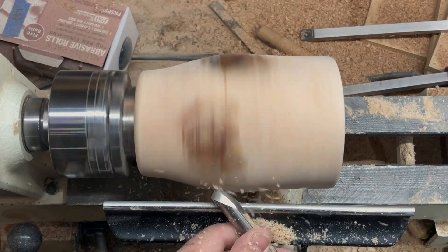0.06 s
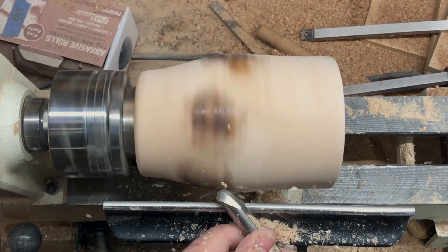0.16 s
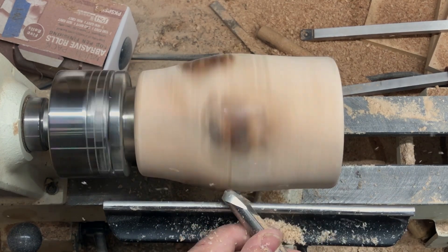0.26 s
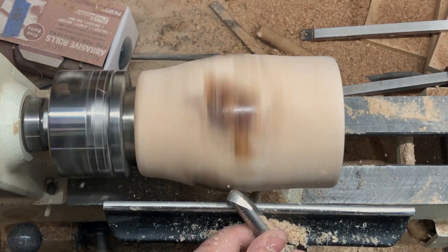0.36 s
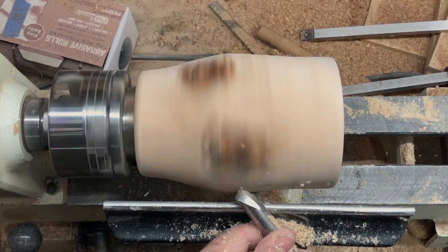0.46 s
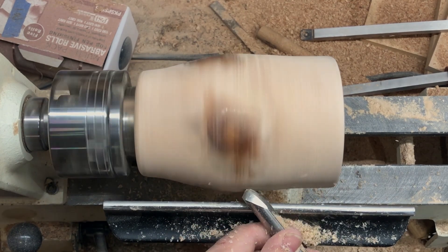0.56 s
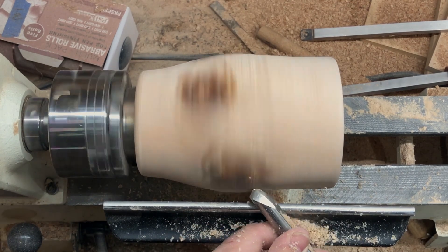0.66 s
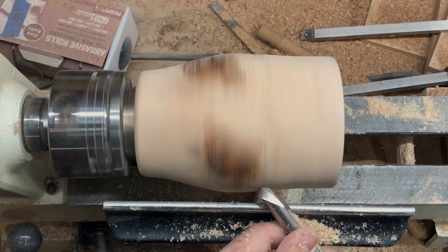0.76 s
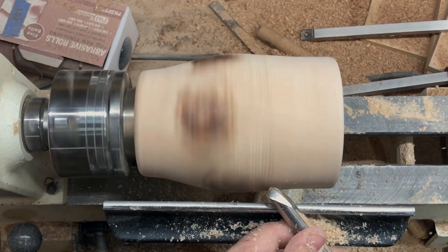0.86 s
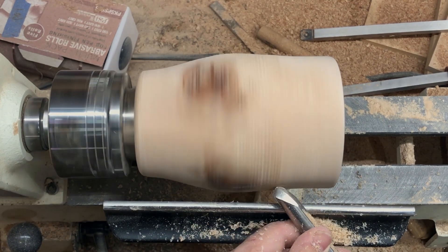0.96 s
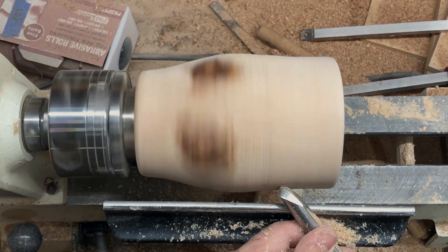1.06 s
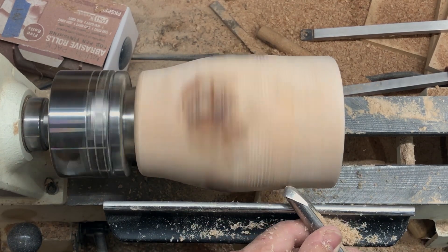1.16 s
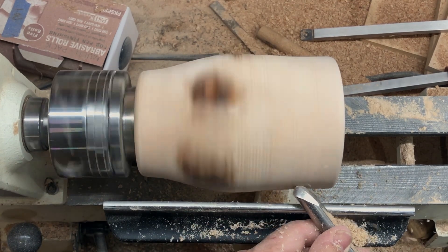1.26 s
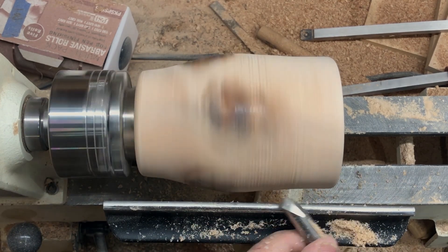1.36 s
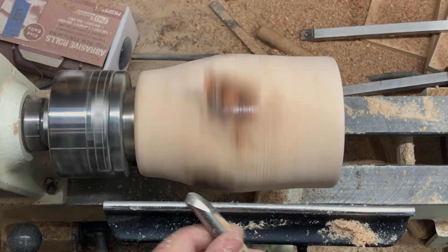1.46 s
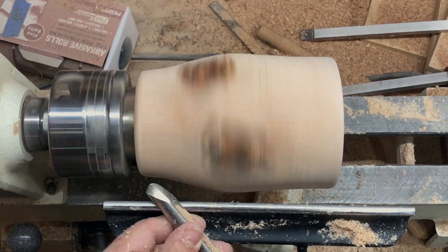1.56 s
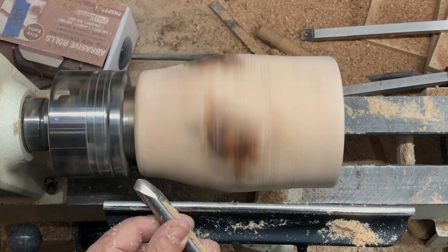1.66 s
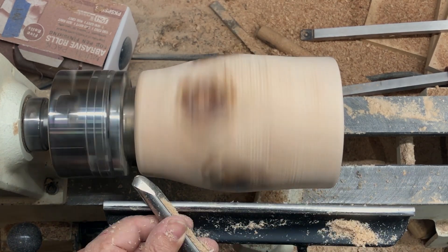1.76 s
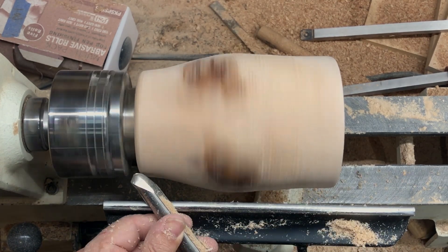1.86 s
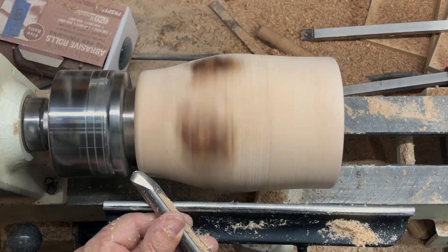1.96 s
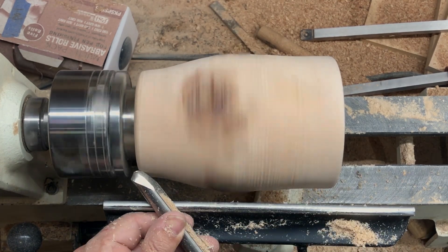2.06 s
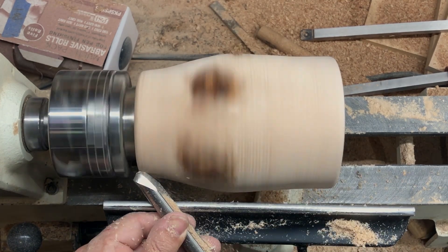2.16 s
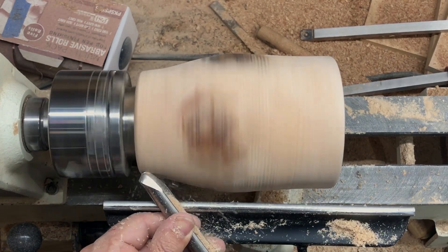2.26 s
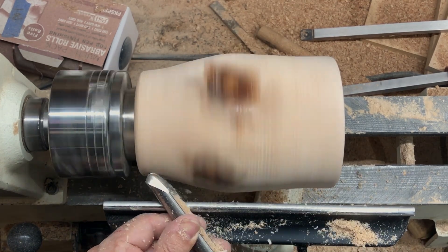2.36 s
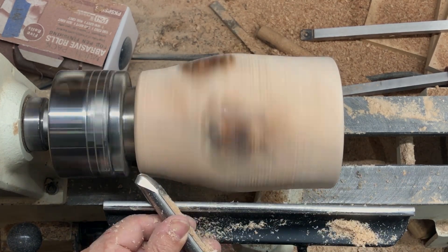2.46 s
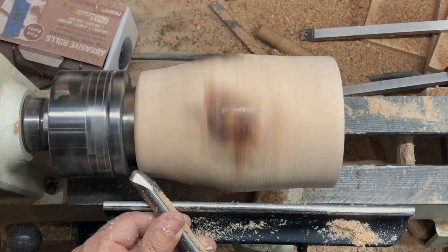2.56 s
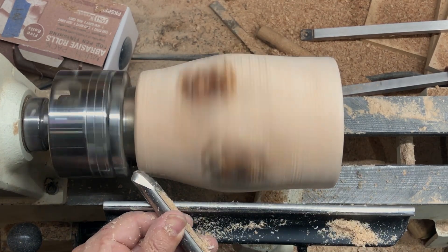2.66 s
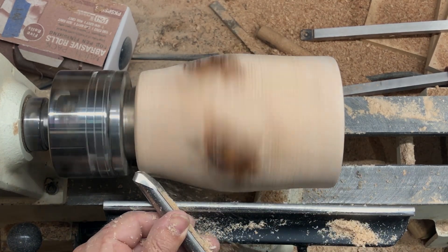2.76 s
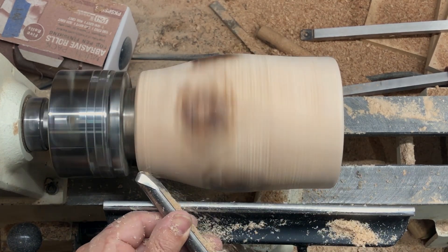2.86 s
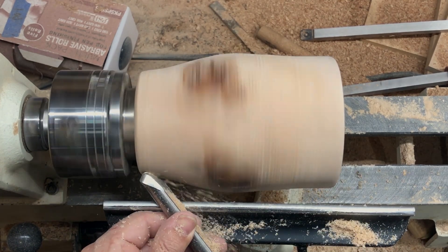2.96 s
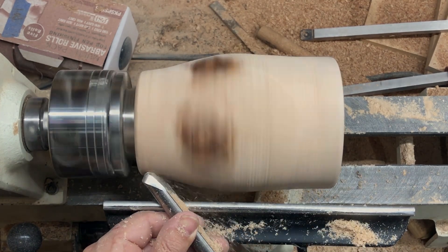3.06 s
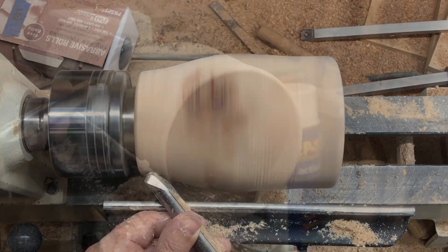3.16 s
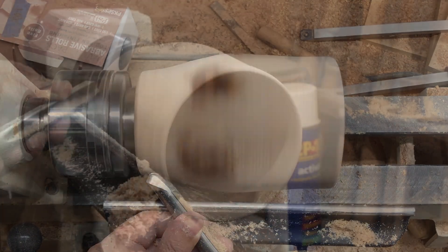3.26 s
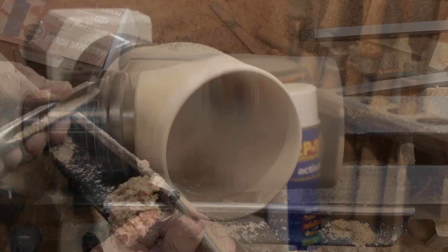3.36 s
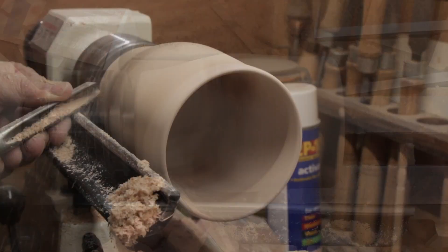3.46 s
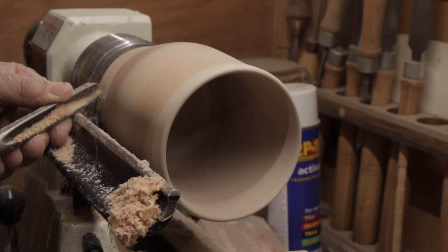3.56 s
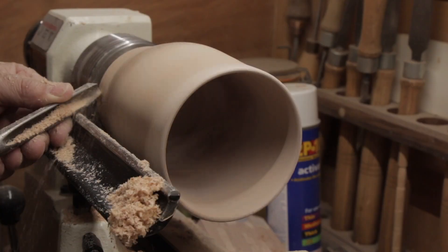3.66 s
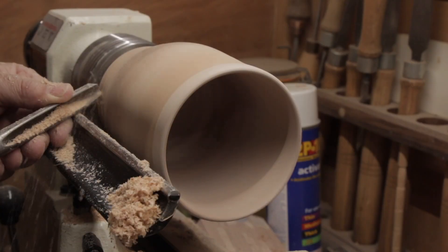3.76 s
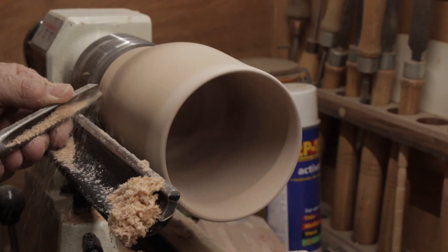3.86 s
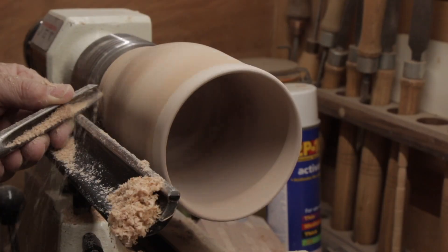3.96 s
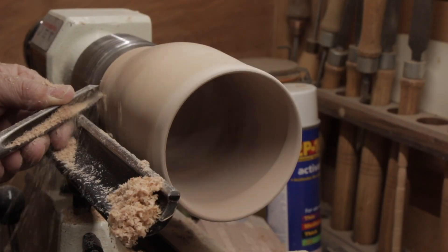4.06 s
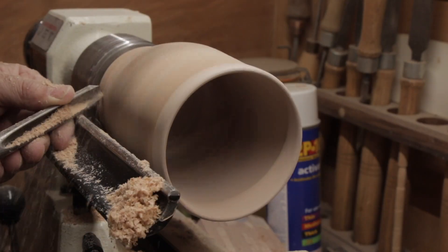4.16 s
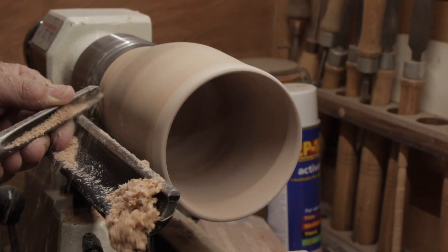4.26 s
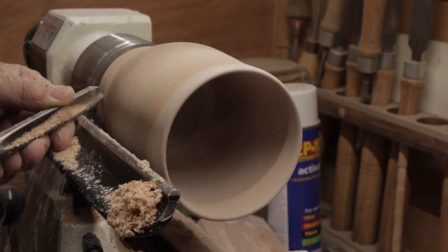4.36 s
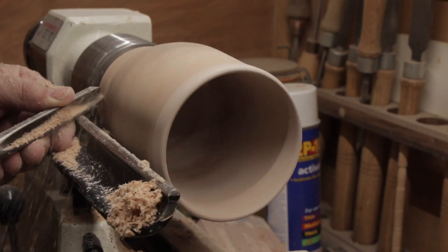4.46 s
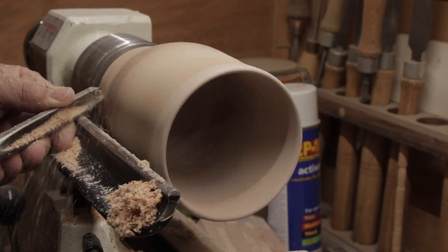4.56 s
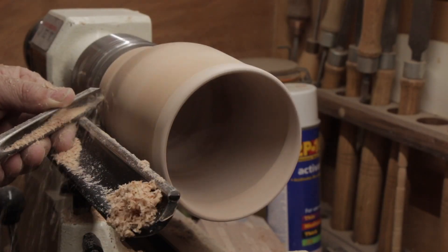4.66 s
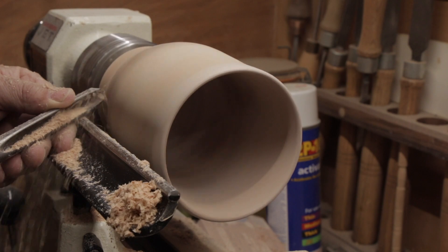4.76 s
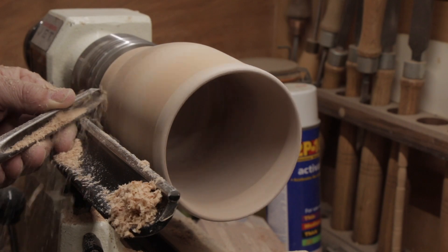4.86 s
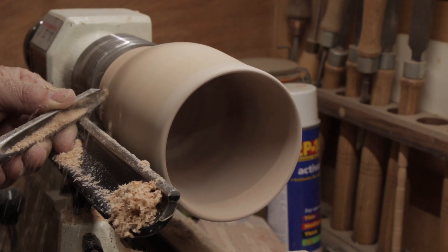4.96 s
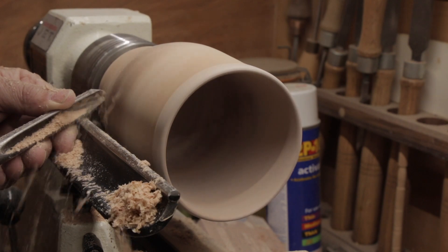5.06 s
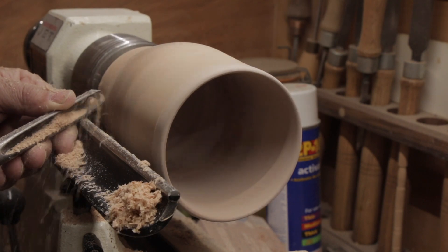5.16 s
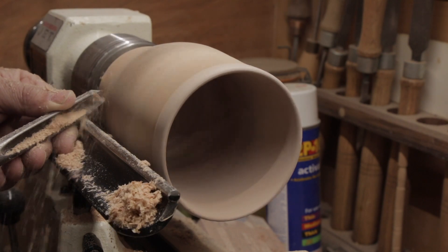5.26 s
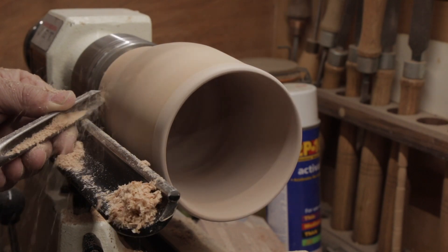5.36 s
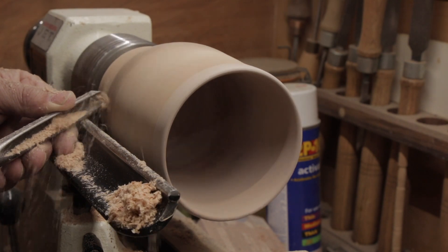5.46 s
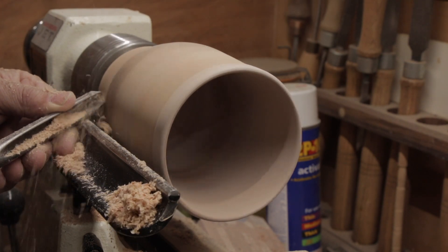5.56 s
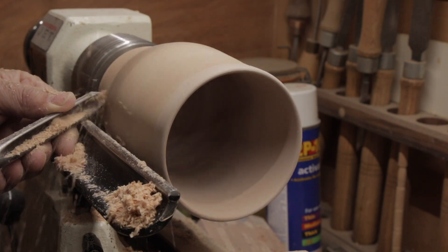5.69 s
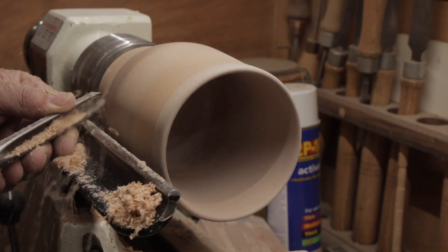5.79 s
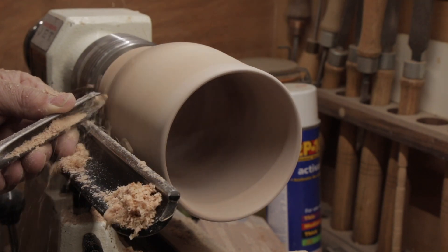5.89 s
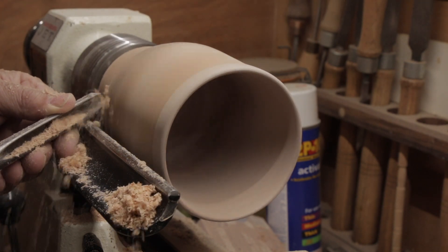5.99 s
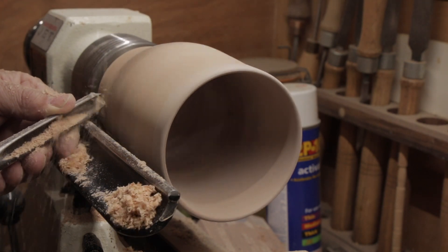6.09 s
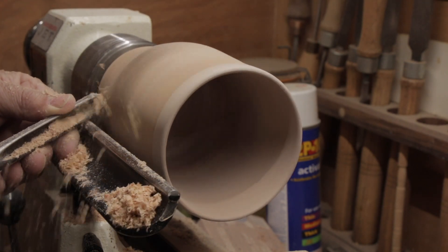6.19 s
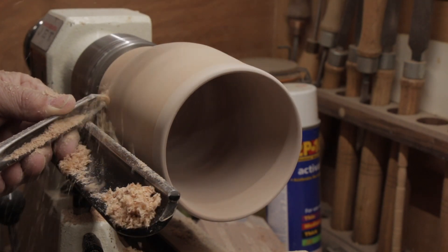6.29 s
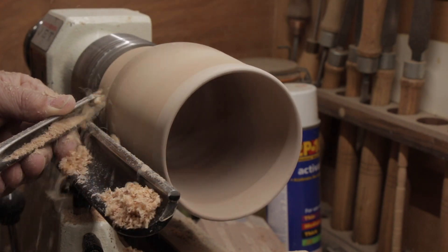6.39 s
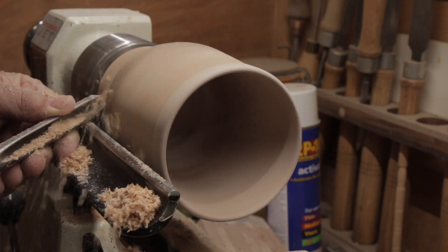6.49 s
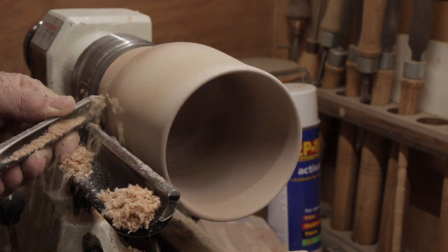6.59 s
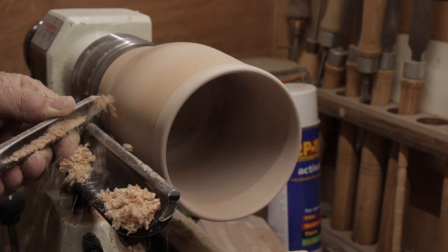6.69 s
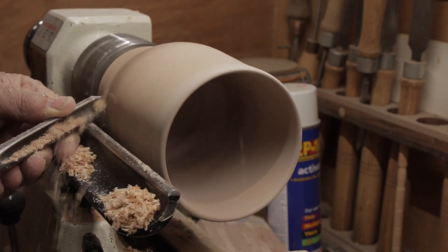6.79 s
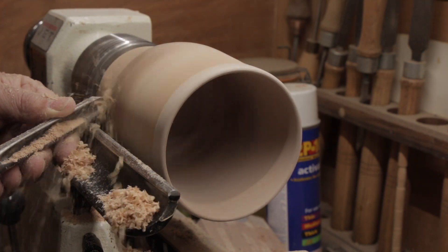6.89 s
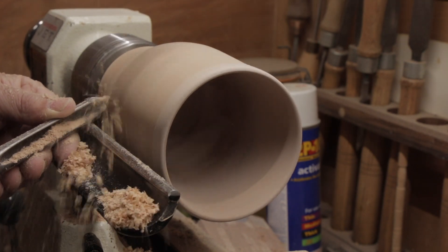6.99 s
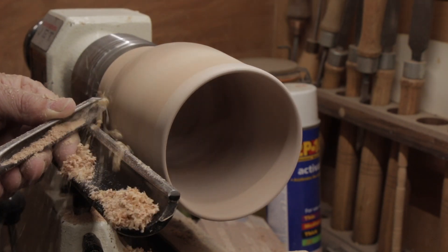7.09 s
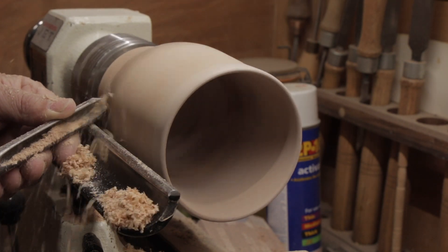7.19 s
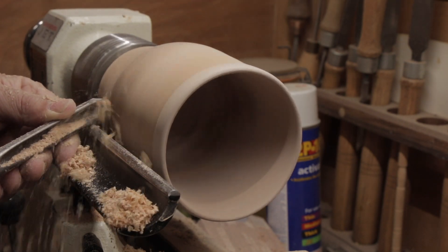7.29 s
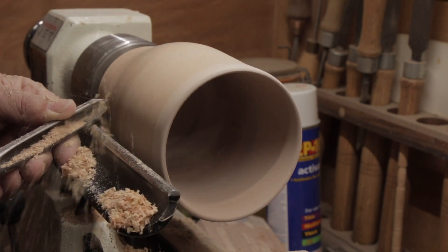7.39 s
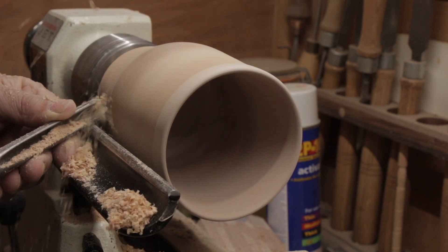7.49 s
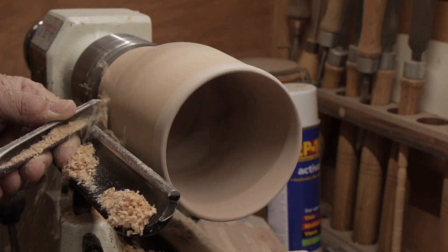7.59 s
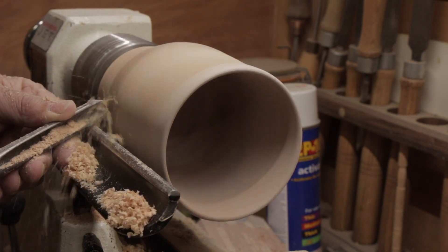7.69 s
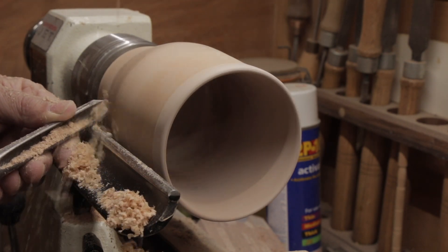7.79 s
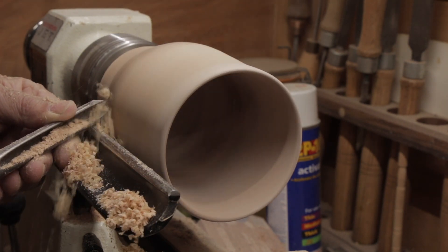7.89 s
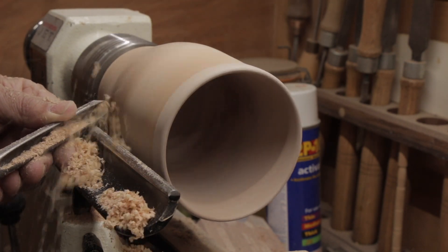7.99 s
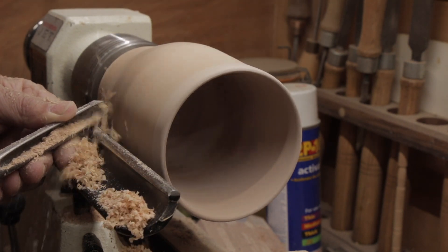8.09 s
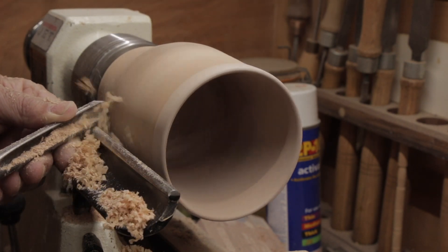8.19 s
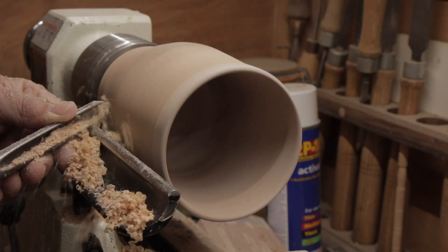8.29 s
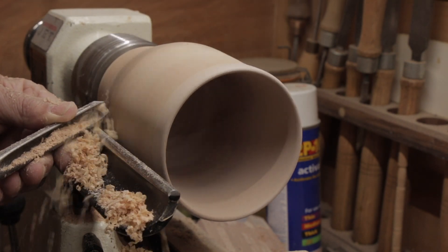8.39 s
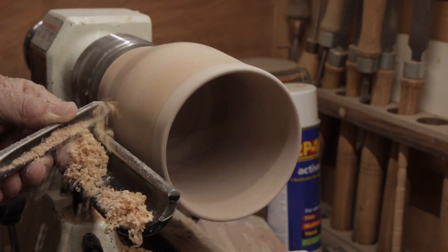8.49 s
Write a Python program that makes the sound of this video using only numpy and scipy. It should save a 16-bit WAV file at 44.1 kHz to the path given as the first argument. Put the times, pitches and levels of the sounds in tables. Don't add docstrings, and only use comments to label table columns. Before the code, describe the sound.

A lathe motor hums steadily while a gouge shaves spinning wood with a fluttering rasp, pauses, then returns closer, louder and with a chattering whine.

```python
import sys
import numpy as np
from scipy import signal
from scipy.fft import rfft, irfft, next_fast_len
from scipy.io import wavfile

SR = 44100
rng = np.random.default_rng(int(sys.argv[2]) if len(sys.argv) > 2 else 0)


def volts(x):
    e = np.asarray(x, float) / 20
    return 10 ** e


def transcribe(signal):
    frames = np.atleast_2d(signal).T
    limited = np.clip(frames, -1, 1)
    pcm = np.round(limited * 32767).astype(np.int16)
    wavfile.write(sys.argv[1], SR, pcm)


N = 376613
SIZE = next_fast_len(N, real=True)
HZ = np.fft.rfftfreq(SIZE, 1 / SR) + 1e-3
T = np.arange(N) / SR

DISSOLVE_FROM_S, DISSOLVE_TO_S = 3.084, 3.58
# in_from_s, in_to_s, out_from_s, out_to_s
POSITIONS = [
    (-1, 0, .45, .8),
    (.45, .8, 1.7, 1.8),
    (1.7, 1.8, 3.2, 3.5),
    (3.2, 3.5, 5.2, 6.5),
    (5.2, 6.5, 9, 10),
]
POSITION_WEIGHTS = (1, 1, 1, 4, 4)

HUM_HZ, HUM_TURN, HUM_DB = (120.024, 119.991), (-.186, .445), (-39.2, -36.6)
HUM_SETTLES_DB, HUM_SETTLES_S = -3, .15
WHISTLE_HZ, WHISTLE_DB, WHISTLE_LOADED_DB = 1255.4, -57, -7.5
STUMBLE_S, STUMBLE_DB, STUMBLE_WIDTH_S = 2.035, -26, 0.016
# pitch_hz, width_hz, rms_db
WHINES = [(249, 54, -66), (552, 28, -71.5), (739, 33, -69), (1140, 50, -92.5), (6170, 200, -98),
          (1820, 80, -83), (2340, 150, -91), (2950, 200, -84), (3480, 200, -88.5), (5200, 200, -94.5)]
TONES_HZ = [361, 485, 754, 899, 1383]
# far_rms_db, close_rms_db
TONES_DB = [(-63.5, -62.5), (-67.5, -75), (-68.5, -91), (-76, -72.5), (-78, -94)]
# pitch_hz, level_db_per_hz
BEARINGS = [(20, -16), (70, 3.5), (90, -11), (180, 0), (420, -1), (700, -4), (1050, -6.5), (1500, -8),
            (3000, -23.5), (4600, -27.5), (6500, -31.5), (10000, -32.5), (16000, -59)]
BEARINGS_DB = -64.5
SHOP_T60_S, SHOP_DB = 0.11, -29.5
TOP_HZ = 15770

# pitch_hz, width_hz, level_db
THUD = [
    [(148, 62, -0.5), (196, 37, 3.3), (254, 60, -1), (335, 21, -5)],
    [(94, 30, -4), (155.5, 92, -8), (213.6, 27.6, 0.5), (265, 41, -5), (344, 55, -15.5)],
]
# pitch_hz, width_hz, level_db
KNOCK = [
    [(601, 40, -1), (650, 110, -3), (745, 57, 2), (986, 61, -8.5), (1150, 105, -6)],
    [(437, 57, -2.5), (610, 51, 1.5), (799, 42, 4), (1004, 36, -2), (1113, 70, 2.5), (1342, 120, -0.5)],
]
THUD_IDLE_DB, KNOCK_IDLE_DB = -94, -72.5
# start_s, peak_db, knock_over_thud_db
JOLTS = [(6.347, -38, -5), (6.474, -33, -15), (6.916, -28, -5), (6.968, -45, 3), (7.113, -37, -8),
         (7.295, -34, -11), (7.367, -27, -7), (7.718, -39, -4), (7.984, -46, 6), (8.072, -34, 0),
         (8.111, -35, -15), (8.163, -33, -16), (8.243, -33, -11), (8.459, -43, -4)]
JOLT_DB = 1
# centre_s, pitch_hz, peak_db, length_s
CHIPS = [(1.504, 3000, -62, .003), (1.513, 4580, -67, 0.0093), (1.506, 9150, -76, .01),
         (1.512, 6250, -75, .015), (5.256, 3800, -15.5, 0.0034), (1.3, 3700, -66, 0.014),
         (1.997, 3300, -45, 0.0091), (0.089, 5800, -25, .003), (5.4, 4500, -25, 0.0033),
         (4.04, 3550, -29, 0.02), (3.9, 3100, -29, 0.02)]

# time_s, swell_db per turn, ahead_turns (how far the swell runs ahead, in turns)
SPIN = [
    [(.13, 2.6, -.09), (.2, 1.2, -.1), (.4, 2., 0), (.55, 2.2, .3), (.85, 2.5, .27), (1.0, 4.3, .29),
     (1.3, 3.6, .25), (2.0, 1.5, .06), (3.1, 1., -.03)],
    [(3.2, 1.2, -.45), (5.4, .8, -.42), (8.5, .6, -.45)],
]
TURNS_PER_S = (25.5, 24.6)

# time_s, bite_db (shaving), load_db (thud of the rest)
ROUGHING = [
    (0.0, -40, -51.5),
    (.2, -38.5, -46),
    (.3, -36.5, -43.5),
    (.4, -37.5, -45),
    (.6, -41.5, -52),
    (.9, -40, -55.5),
    (1.05, -41, -58),
    (1.29, -39, -53),
    (1.338, -46, -67),
    (1.352, -69, -67),
]
BRUSH = [
    (1.5, -80, -87),
    (1.516, -79, -80),
]
SHORT_PASS = [
    (1.995, -53, -66),
    (2.137, -46, -71),
    (2.359, -42, -69),
    (2.392, -43, -69),
]
LONG_PASS = [(2.617, -56.5, -75), (2.66, -49.5, -70), (2.8, -42.5, -68), (3.08, -40, -66.5),
             (3.25, -43, -65), (3.42, -36.5, -68), (3.58, -32.5, -68), (4.2, -30.5, -65.5), (5.1, -28, -58),
             (5.7, -30.5, -54), (6.2, -31.5, -48.5), (6.76, -30.5, -46.5), (7.2, -29.5, -49),
             (7.55, -31, -45), (8.54, -32, -47.5)]
ENTER_DB_PER_S, LEAVE_DB_PER_S = 2097, 893.5
TREBLE_LEAVES_DB_PER_S, REST_LEAVES_DB_PER_S = 199, 159
MEAN_BITE_DB = -35
LOW_FOLLOWS_HAND = 0.48
# centre_s, bite_db, load_db
SURGES = [(.18, 3, 0.7), (4.2, 0.5, -5), (4.38, 0, -3), (4.7, 0.5, 1), (5.2, 0, -1), (5.76, -0.5, 4.5),
          (6.33, 1.4, 3.5), (6.56, 3.5, 0.8), (6.93, 3.5, 6.5), (7.12, 1, 5.5), (7.3, 2, 5.5), (7.39, 2, 3),
          (7.75, 1, 1.2), (8.0, 1.2, 4.5), (8.11, 1.5, -0.5), (8.27, 1, 5.5), (8.53, 0.1, 5)]
SURGE_S = 0.057
TREBLE_FOLLOWS, LOW_FOLLOWS, KNOCK_FOLLOWS = 0.92, 0.98, 1
# treble_db, low_middle_db, knock_over_thud_db
BALANCE = [
    (-1, -5.5, -7),
    (0, -0.5, 4),
    (7.5, -4, 3.5),
    (-1.5, 5.5, -1.5),
    (0, 1.5, -4.5),
]
# centre_s, change_db
SLIPS = [(0.082, 2.5), (0.123, 3), (0.194, 3), (.337, -6), (.716, -7), (.722, 2), (1.997, -3), (2.019, -10),
         (2.64, -4), (3.813, -4), (5.055, -5), (5.551, -7), (5.663, -5), (5.991, -10), (6.61, -9),
         (6.845, -5), (6.906, 4), (6.949, -3), (7.051, -2), (7.181, -5), (7.226, -6), (7.267, -5),
         (7.48, -2), (8.153, -10), (8.192, -7), (8.44, -8)]
SLIP_S = 0.003

# pitch_hz, width_hz, level_db
RINGS_FAR = [
    [(2284, 49, 2.5), (2840, 81, 2), (3450, 220, -4), (4100, 160, -5), (4560, 32, -10), (4820, 100, -1),
     (6240, 96, -2), (7000, 61, -15), (6960, 82, 3.5), (7880, 250, -4.5), (9330, 80, -6.5),
     (10900, 130, -20), (11700, 46, -18), (13200, 190, -12.5)],
    [(1370, 71, -6), (2330, 150, 0.5), (2890, 54, 0), (3530, 250, -0.5), (4300, 37, -3), (4580, 190, 0),
     (5570, 70, 3), (6320, 75, -3), (7230, 240, 3.5), (7600, 100, -3), (8400, 220, -3), (11700, 120, -7.5),
     (12900, 88, -24)],
    [(1784, 27, 2), (2650, 230, 2.5), (2870, 76, 6.5), (3610, 60, 11.5), (4130, 50, -3), (4630, 91, -10),
     (5800, 88, -7.5), (6190, 69, -6), (7250, 120, -5.5), (8750, 63, -10), (8530, 79, -7),
     (9000, 130, -8.5)],
]
# pitch_hz, width_hz, level_db
RINGS_NEAR = [
    [(1645, 76, -21), (1870, 18, -12), (2050, 43, -15), (2440, 91, -13), (2524, 21, -11), (2760, 114, -11),
     (2910, 36, -3), (3343, 58, -6.5), (3560, 52, -2), (4640, 89, -12), (6100, 90, -22.5),
     (9120, 420, -24.5)],
    [(1582, 30, -17.5), (1810, 72, -21.5), (2020, 28, -13.5), (2300, 93, -10), (2849, 90, 1),
     (3336, 59, -1), (4735, 130, -5), (5390, 53, -18), (6950, 53, -19.5), (10900, 150, -23),
     (11800, 140, -23)],
]
# pitch_hz, width_hz, level_db
STEEL = [
    [],
    [],
    [],
    [(2116, 36, -15), (3110, 93, -11), (3705, 40, -8), (3950, 37, -12), (4205, 73, -8.5), (4730, 18, -4.5),
     (5550, 40, -23), (6100, 60, -33), (7330, 63, -26)],
    [(3523, 98, -12), (3690, 33, -14), (4110, 28, -14), (4221, 35, -19), (5620, 50, -11), (5870, 47, -20),
     (6080, 37, -12), (6330, 54, -17), (6860, 37, -10.5), (7540, 140, -15), (8080, 60, -21),
     (9180, 110, -26.5), (12500, 150, -33)],
]
# pitch_hz, level_db_per_hz
HISS = [
    [(760, -44), (1300, -14), (2000, -15), (2860, -7.5), (3880, -9), (4880, -1), (12800, -11.5),
     (16000, -18)],
    [(760, -30), (1300, -15.5), (2020, -13), (2290, -27), (2600, -4), (5540, 0), (8520, -6.5),
     (16000, -12.5)],
    [(820, -58), (1400, -13.5), (3580, 2), (4000, -5), (4610, 7), (5210, -6.5), (9040, -12), (16000, -21)],
    [(760, -39), (1300, -25), (2220, -25), (2860, 0.5), (3140, -17), (4680, -2), (5200, -15),
     (16000, -25.5)],
    [(760, -38), (1300, -23.5), (2550, -20.5), (2860, 3), (3110, -2.5), (4780, -8), (12200, -22.5),
     (16000, -29.5)],
]
HISS_DB = [-2, -3, -0.5, -6.5, -5]
# pitch_hz, width_hz, depth (0-1)
NOTCHES = [
    [(2210, 300, 0.7), (4030, 230, 0.6), (10300, 900, 0.15)],
    [(2070, 200, 0.75), (7270, 290, 0.9), (11100, 900, 0.35)],
    [(4000, 210, 0.47), (10700, 900, 0.43), (6660, 240, 0.2)],
    [(2640, 69, 0), (4260, 230, 0.56), (6470, 200, 0.5), (10100, 1150, 0.54), (15400, 6900, 0.68)],
    [(2534, 86, 0.7), (4320, 200, 0.5), (8000, 170, 0.4), (10160, 420, 0.33), (13100, 500, 0.3)],
]
PATCHES_HZ = [2300, 3400, 4800, 6200, 7600, 9500, 12000, 15000]

SING_HZ, SING_WANDER_HZ, SING_BEADS_DB = 2905, 12, 0.8
SING_DB = (-2.5, -3.5)
SING_FROM_S, SING_TO_S = 3.1, 3.4
# centre_s, change_db, length_s
CHATTER = [(3.427, 8, 0.0098), (3.537, -3, 0.007), (3.546, 5.5, 0.0073), (3.627, 5, 0.012),
           (3.672, 4, 0.0088), (3.712, 6, 0.016), (3.83, 5, 0.0091), (4.061, -7, 0.006), (4.098, -2, 0.02),
           (4.129, 4.5, 0.011), (4.209, 1, 0.009), (4.286, 4, 0.017), (4.321, 4, 0.009),
           (4.375, -10.2, 0.015), (4.448, -11, 0.0059), (4.689, 3.6, 0.01), (4.725, 4, 0.0099),
           (4.82, 2, 0.022), (4.896, 4.5, 0.008), (5.03, 2.5, 0.012), (5.081, -11, 0.0063),
           (5.095, 3.1, 0.008), (5.202, 3.4, 0.016), (5.265, 0.5, 0.0057), (5.35, -7, 0.017),
           (5.51, 2, 0.018), (5.55, -10, 0.009), (5.57, 4.5, 0.02), (5.627, 1, 0.006), (5.738, -7.0, 0.014),
           (5.869, 0, 0.012), (5.956, -7, 0.01), (5.977, 2, 0.008), (6.017, 1.5, 0.017), (6.193, 4, 0.0082),
           (6.36, 2, 0.02), (6.421, 3, 0.0056), (6.736, -3, 0.013), (6.841, -5, 0.017), (6.91, 3.5, 0.014),
           (6.972, 4, 0.015), (7.043, -3, 0.018), (7.092, 5.5, 0.018), (7.141, 4, 0.0065),
           (7.229, -8.8, 0.0062), (7.349, 6, 0.018), (7.421, 4.5, 0.015), (7.499, -7, 0.014),
           (7.54, 5, 0.011), (7.57, -4, 0.013), (7.742, 4.9, 0.017), (7.88, 5, 0.012), (7.954, -5.4, 0.02),
           (8.107, 3.5, 0.017), (8.15, -2, 0.018), (8.29, 4.2, 0.017), (8.395, -6.1, 0.015),
           (8.47, 0, 0.0088)]
CHATTER_WIDTH_HZ = 130
# centre_s, change_db, length_s
FLARES = [(3.516, 5.7, 0.018), (3.877, 3.4, 0.014), (4.425, 6, 0.006), (4.486, 6, 0.02), (4.865, 0, 0.01),
          (4.908, 3.2, 0.012), (5.19, 8, 0.013), (5.512, 3, 0.011), (5.803, 7, 0.016), (6.286, 5, 0.018),
          (6.42, 7, 0.012), (6.653, 4.4, 0.015), (6.908, 3, 0.018), (7.365, 5, 0.011), (7.403, 3, 0.013),
          (7.669, 6, 0.017), (8.102, 6.4, 0.01), (8.308, 2, 0.02)]
FLARE_HZ, FLARE_WIDTH_HZ = 4745, 120


def rms_one(x):
    return x / np.sqrt(np.mean(x ** 2) + 1e-20)


def in_time(rows):
    s, *columns = np.transpose(rows)
    return [np.interp(T, s, column) for column in columns]


def bell(s, width_s):
    out = np.zeros(N)
    near = slice(max(int((s - 5 * width_s) * SR), 0), int((s + 5 * width_s) * SR))
    out[near] = np.exp(-.5 * ((T[near] - s) / width_s) ** 2)
    return out


def drift(rate_hz):
    count = N // 64 + 2
    hz = np.fft.rfftfreq(count, 64 / SR)
    slow = irfft(rfft(rng.standard_normal(count)) * (hz > 1) / (1 + (hz / rate_hz) ** 2))
    return np.interp(np.arange(N) / 64, np.arange(len(slow)), rms_one(slow))


def grains(per_s, spread_db):
    sizes = volts(spread_db * np.minimum(rng.exponential(1, N), 5)) * rng.choice([-1, 1], N)
    return rms_one(sizes * (rng.random(N) < per_s / SR))


def resonances(peaks):
    f = HZ[::16]
    response = 0
    for k, (hz, width, db) in enumerate(sorted(peaks)):
        response = response + (-1) ** k * volts(db) * 1j * f * width / (hz ** 2 - f ** 2 + 1j * f * width)
    return np.interp(HZ, f, response)


def colour(points):
    hz, db = np.transpose(points)
    return volts(np.interp(np.log(HZ), np.log(hz), db))


def through(x, response):
    return irfft(rfft(x, SIZE) * response, SIZE)[:N]


def dissolve():
    progress = np.clip((T - DISSOLVE_FROM_S) / (DISSOLVE_TO_S - DISSOLVE_FROM_S), 0, 1)
    return .5 - .5 * np.cos(np.pi * progress)


def shop(x):
    age = np.arange(SR // 4) / SR
    dull = signal.lfilter([1], [1, -.6], rng.standard_normal(len(age)))
    tail = dull * volts(-60 * age / SHOP_T60_S) * (age > .003)
    return signal.fftconvolve(x, tail / np.sqrt(np.sum(tail ** 2)))[:N]


def hum(place):
    db = HUM_DB[place] + HUM_SETTLES_DB * np.exp(-T / HUM_SETTLES_S)
    return np.sqrt(2) * volts(db) * np.cos(2 * np.pi * (HUM_HZ[place] * T + HUM_TURN[place]))


def whistle():
    loaded = np.clip((ROUGHING[-1][0] - T) / .04 + 1, 0, 1)
    db = WHISTLE_DB + WHISTLE_LOADED_DB * loaded + STUMBLE_DB * bell(STUMBLE_S, STUMBLE_WIDTH_S)
    level = np.sqrt(2) * volts(db + .6 * drift(8.))
    return level * np.sin(2 * np.pi * WHISTLE_HZ * T + .3 * drift(3.))


def whines(near):
    white = rng.standard_normal(N)
    out = 0
    for hz, width, db in WHINES:
        out = out + volts(db) * rms_one(through(white, resonances([(hz, width, 0)]) ** 2))
    for hz, (far_db, near_db) in zip(TONES_HZ, TONES_DB):
        waver = volts(far_db + (near_db - far_db) * near + 2.0 * drift(9.))
        out = out + np.sqrt(2) * waver * np.sin(2 * np.pi * hz * T + 1.0 * drift(7.6))
    return out


def motor():
    near = dissolve()
    bearings = volts(BEARINGS_DB) * rms_one(through(rng.standard_normal(N), colour(BEARINGS)))
    return (1 - near) * (hum(0) + whistle()) + near * hum(1) + whines(near) + bearings


def pressure(column, leave_db_per_s, follows=1):
    out = 0
    for contact in (ROUGHING, BRUSH, SHORT_PASS, LONG_PASS):
        early = np.maximum(contact[0][0] - T, 0)
        late = np.maximum(T - contact[-1][0], 0)
        hand_db = MEAN_BITE_DB + follows * (in_time(contact)[column] - MEAN_BITE_DB)
        out = out + volts(hand_db - ENTER_DB_PER_S * early - leave_db_per_s * late)
    return out


def surges_db():
    return sum(np.outer([bite, load], bell(s, SURGE_S)) for s, bite, load in SURGES)


def slips_db():
    marks, around = np.zeros(N), np.arange(-1000, 1001) / SR
    for s, db in SLIPS:
        marks[int(s * SR)] = db
    return signal.fftconvolve(marks, np.exp(-.5 * (around / SLIP_S) ** 2), "same")


def balance_db():
    shares = np.array([weight * np.interp(T, fade, [0, 1, 1, 0])
                       for weight, fade in zip(POSITION_WEIGHTS, POSITIONS)])
    return np.transpose(BALANCE) @ (shares / shares.sum(axis=0))


def bite_db(lead_turns, depth):
    near, swell = dissolve(), []
    for table, per_s in zip(SPIN, TURNS_PER_S):
        swell_db, ahead = in_time(table)
        angle = 2 * np.pi * (per_s * T + ahead + lead_turns)
        swell.append(depth * swell_db * (np.cos(angle) - 0.31 * np.cos(2 * angle + .25)))
    return (1 - near) * swell[0] + near * swell[1]


def rest():
    load, surge_db = pressure(column=1, leave_db_per_s=REST_LEAVES_DB_PER_S), surges_db()[1]
    thud_gain = load * volts(surge_db) + volts(THUD_IDLE_DB)
    knock_gain = load * volts(balance_db()[2] + KNOCK_FOLLOWS * surge_db) + volts(KNOCK_IDLE_DB)
    near = dissolve()
    lumps = drift(35.0)
    push = volts(bite_db(.12, .6 + 2.0 * near) + 0.6 * lumps) * grains(2500., 2.5)
    rap = volts(bite_db(0, 1.4) + .8 * lumps + .8 * drift(30.)) * grains(4000., 2.6)
    thud_band = 1 / (1 + (85 / HZ) ** 4)
    knock_band = 1 / (1 + (420 / HZ) ** 4) / (1 + (HZ / 1400) ** 4)
    out = 0
    for share, thud, knock in zip((1 - near, near), THUD, KNOCK):
        low = rms_one(through(push, resonances(thud) * thud_band))
        middle = rms_one(through(rap, resonances(knock) * knock_band))
        out = out + share * (thud_gain * low + knock_gain * middle)
    return out


def jolts():
    out = 0
    for peaks, share in ((THUD[1], 0), (KNOCK[1], 1)):
        blows = np.zeros(N)
        for s, db, knock_db in JOLTS:
            blows[int(s * SR)] = volts(db + JOLT_DB + share * knock_db)
        response = resonances([(hz, 1.6 * width, db) for hz, width, db in peaks])
        response = response / (1 + 1j * HZ / 900) / (1 + (110 / HZ) ** 4)
        out = out + through(blows, response / np.abs(irfft(response, SIZE)).max())
    return out


def chips():
    out = np.zeros(N)
    for s, hz, db, length in CHIPS:
        out += volts(db) * np.exp(-(2 * (T - s) / length) ** 2) * np.sin(2 * np.pi * hz * T)
    return out


def singing():
    share = sum(volts(db) * np.sqrt(np.interp(T, fade, [0, 1, 1, 0])) for db, fade in zip(SING_DB, POSITIONS[3:]))
    share = np.where(T < 4, volts(SING_DB[0]) * np.interp(T, (SING_FROM_S, SING_TO_S), [0, 1]), share)
    turns = np.cumsum(SING_HZ + SING_WANDER_HZ * drift(7.66) + 11.1 * drift(22.7)) / SR
    uneven_db = 0.94 * surges_db()[0] + slips_db() + SING_BEADS_DB * drift(11.0) + 0.67 * drift(34.0)
    level = pressure(column=0, leave_db_per_s=LEAVE_DB_PER_S) * volts(uneven_db)
    return share * level * np.sin(2 * np.pi * turns)


def patchy(x, depth_db):
    spectrum, out = rfft(x, SIZE), 0
    for hz, share in zip(PATCHES_HZ, np.eye(len(PATCHES_HZ))):
        band = irfft(spectrum * np.interp(HZ, PATCHES_HZ, share), SIZE)[:N]
        out = out + band * volts(depth_db * min(hz / 7000, 1) * drift(67.0))
    return out


def torn_fibres():
    uneven_db = bite_db(0, 0.99) + slips_db() + 0.1 * drift(11.0) + .5 * drift(75.0)
    tear, rasp = (rfft(volts(uneven_db + 0.22 * drift(37.9)) * grains(14000., spread_db=2.5), SIZE)
                  for _ in range(2))
    core = (HZ > 2200) & (HZ < 5500)
    sound = 0
    for rings, steel, hiss, hiss_db, notches, fade in zip(RINGS_FAR + RINGS_NEAR, STEEL, HISS, HISS_DB,
                                                          NOTCHES, POSITIONS):
        damped = [(hz, width * (1 + (hz / 9000) ** 3), db) for hz, width, db in rings + steel]
        dead = 1
        for hz, width, depth in notches:
            dead = dead * (1 - min(depth, 3 / 4) / (1 + (2 * (HZ - hz) / width) ** 2))
        ringing = dead * resonances(damped)
        hissing = dead * colour(hiss) * volts(hiss_db)
        power = np.sum((abs(ringing) ** 2 + hissing ** 2)[core]) / len(HZ)
        share = np.sqrt(np.interp(T, fade, [0, 1, 1, 0]))
        sound = sound + share * irfft(tear * ringing + rasp * hissing, SIZE)[:N] / np.sqrt(power)
    return patchy(sound, depth_db=2.05)


def shaving():
    sound = torn_fibres()
    treble = through(sound, 1 / (1 + (5600 / HZ) ** 8))
    low = through(sound, 1 / (1 + (HZ / 2150) ** 12))
    middle = sound - treble - low
    (treble_db, low_db, _), surge_db = balance_db(), surges_db()[0]
    level = pressure(column=0, leave_db_per_s=LEAVE_DB_PER_S)
    bright = pressure(column=0, leave_db_per_s=LEAVE_DB_PER_S + TREBLE_LEAVES_DB_PER_S)
    rub = pressure(column=0, leave_db_per_s=LEAVE_DB_PER_S, follows=LOW_FOLLOWS_HAND)
    return (level * volts(surge_db) * middle + rub * volts(low_db + LOW_FOLLOWS * surge_db) * low
            + bright * volts(treble_db + TREBLE_FOLLOWS * surge_db) * treble)


def chattering(cut):
    out = cut
    for hz, width_hz, dashes in ((SING_HZ, CHATTER_WIDTH_HZ, CHATTER), (FLARE_HZ, FLARE_WIDTH_HZ, FLARES)):
        mode = through(cut, 1 / (1 + ((HZ - hz) / width_hz) ** 4))
        change_db = sum(db * bell(s, length) for s, db, length in dashes)
        out = out + mode * (volts(change_db) - 1)
    return out


def scene():
    behind = motor() + rest() + jolts() + chips()
    cut = chattering(shaving() + singing())
    return (cut + volts(SHOP_DB) * shop(cut) + behind)[None]


def low_pass(x):
    return signal.sosfilt(signal.butter(12, 16690, fs=SR, output="sos"), x)


def record(dry):
    mix = through(dry[0], np.clip((TOP_HZ - HZ) / 100, 0, 1))[None]
    return low_pass(mix)


dry = scene()
out = record(dry)
transcribe(out)
```